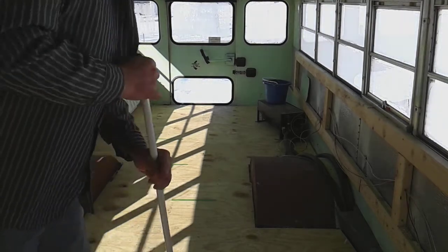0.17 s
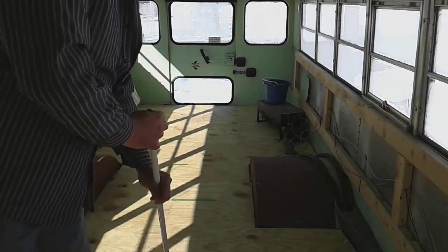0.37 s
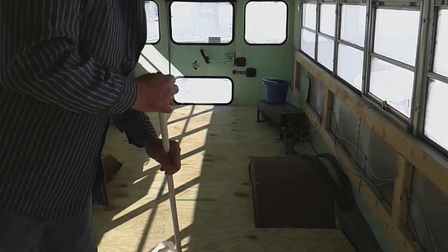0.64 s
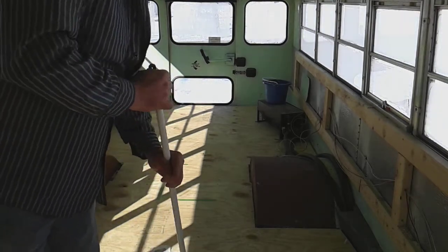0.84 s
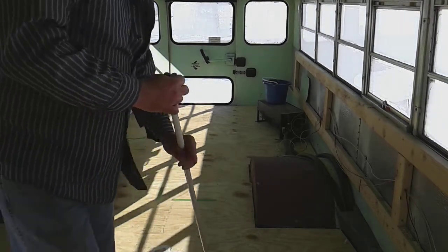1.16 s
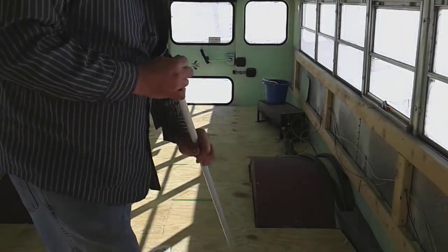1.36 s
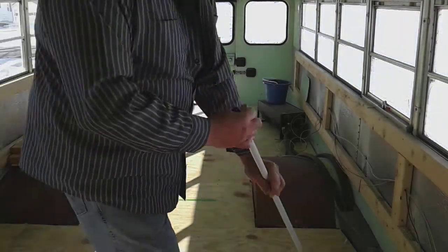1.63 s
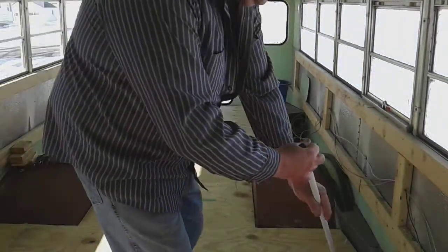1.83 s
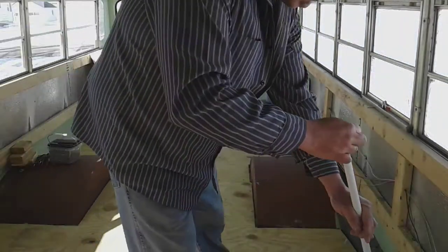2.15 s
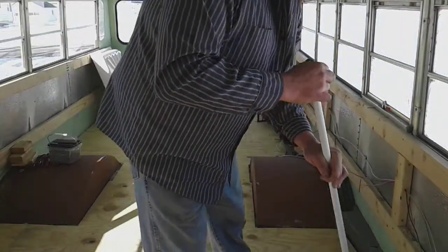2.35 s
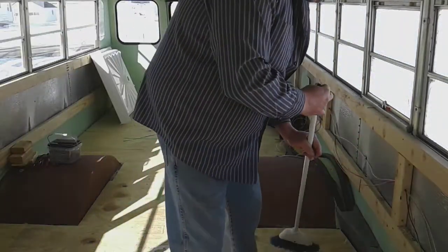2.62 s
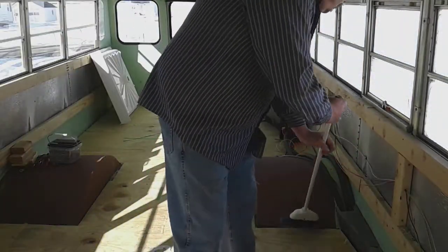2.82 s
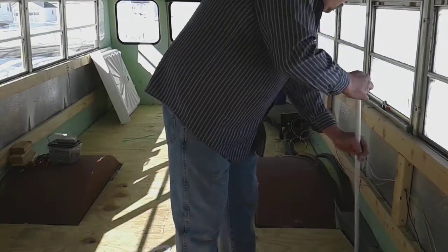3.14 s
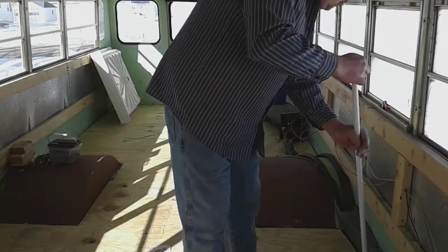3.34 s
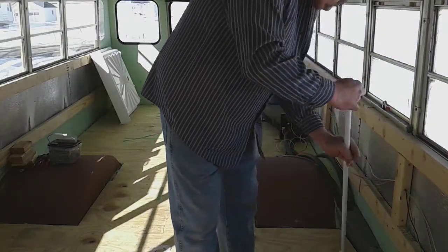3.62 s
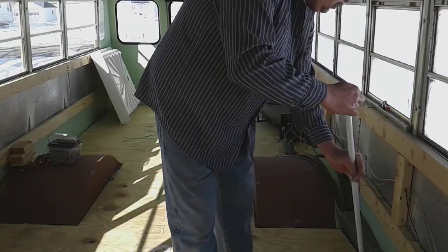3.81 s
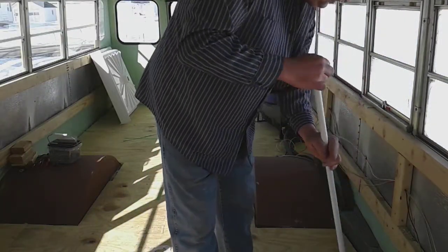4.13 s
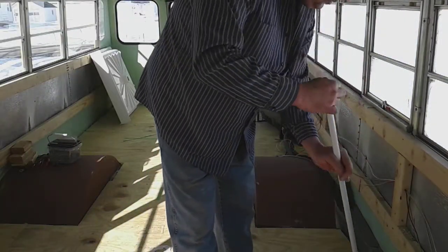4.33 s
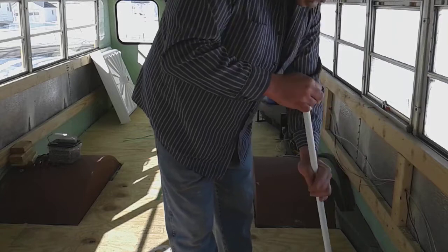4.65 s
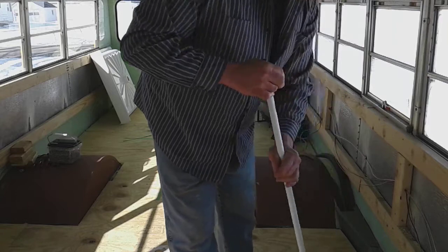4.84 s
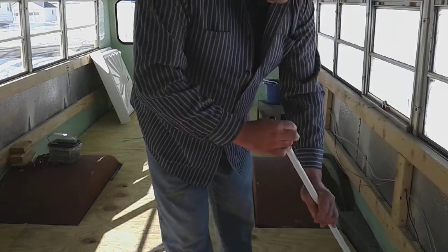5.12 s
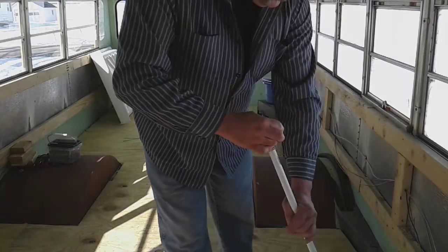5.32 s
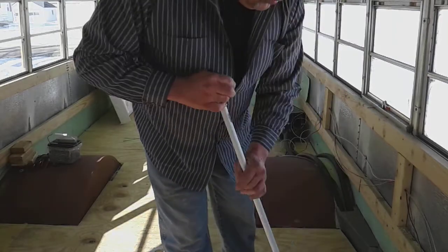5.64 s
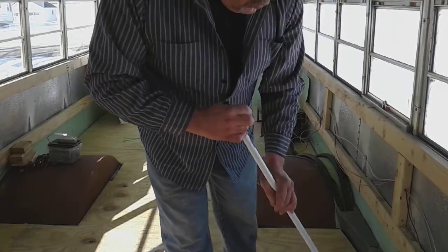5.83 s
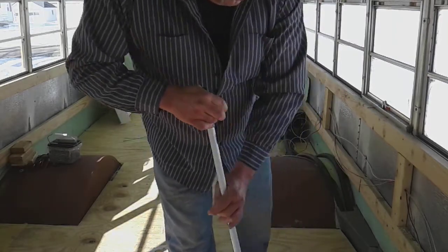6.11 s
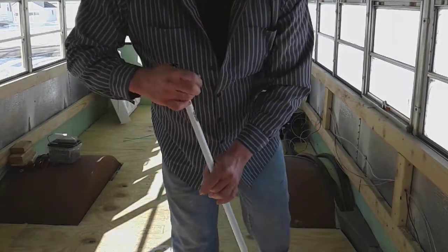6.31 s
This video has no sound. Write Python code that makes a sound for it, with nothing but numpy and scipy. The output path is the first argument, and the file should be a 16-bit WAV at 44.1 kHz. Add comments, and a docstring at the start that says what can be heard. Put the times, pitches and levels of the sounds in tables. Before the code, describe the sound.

A broom works over bare plywood inside an empty bus, heard close on a small microphone with a peaky treble, in a short, boxy reverberation above faint low air. A stroke is already fading at 0 s; feet thud softly around 0.2 s as bristles scuff. Hissing strokes run from 0.3 and 0.9 s, with a bright grit tick at 0.64 s. A sole slaps the loose boards at 1.6 s, another stroke passes at 1.9 s, and a dull footfall lands at 2.5 s. From 2.9 s a stroke swells into the loudest moment, a crunchy shove and hard knock at 3.2-3.4 s. Strokes resume at 3.7 s, with a wall shove and clacks around 3.95-4.2 s, then another stroke and ringing shove at 4.7 s. A hollow bump and sharp ticks come at 5.2-5.3 s over a lighter, longer sweep. A last stroke at 6 s ends in a scraping shove and tap at 6.2 s.

```python
"""Inside an empty bus, a broom sweeps a bare plywood floor close to a small camera's microphone.
Each stroke speeds up, runs and fades: random bristle clicks hiss and scrape, and the boards drum under them.
Four strokes end in a shove against the wall; the broom head taps, and the sweeper's feet bump the deck.
The panels colour the sound and the cabin rings briefly, over steady still air.
The microphone port resonates in the treble, and a noise gate dims the pauses."""
import sys
import numpy as np
from scipy import signal
from scipy.fft import rfft, irfft
from scipy.io import wavfile
from scipy.ndimage import uniform_filter1d

SR = 44100
rng = np.random.default_rng(int(sys.argv[2]) if len(sys.argv) > 2 else 0)


def bounce(signal):
    """Save signal as a 16-bit WAV file at the path given by the first command-line argument."""
    frames = np.transpose(np.atleast_2d(signal))
    limited = np.clip(frames, -1, 1)
    pcm = np.round(limited * 32767).astype(np.int16)
    wavfile.write(sys.argv[1], SR, pcm)


N = 285327
TIME = np.arange(N) / SR


def gain_of(db):
    """Decibels to amplitude."""
    return 10 ** (np.asarray(db) / 20)


def evened(x):
    """Scales to rms 1."""
    return x / np.sqrt(np.mean(x ** 2) + 1e-20)


def read(points, hz):
    """Reads a table on a logarithmic frequency axis."""
    f, value = np.transpose(points)
    return np.interp(np.log(hz + 1), np.log(f + 1), value)


def add(mix, s, sound):
    """Mixes a sound in at time s (seconds)."""
    part = mix[max(round(s * SR), 0):][:len(sound)]
    part += sound[:len(part)]


def colour(x, db_at, size=8192):
    """Causal minimum-phase filter whose gain in dB is the function db_at(Hz)."""
    hz = abs(np.fft.fftfreq(size, 1 / SR))
    log_gain = np.log(gain_of(db_at(hz)))
    response = np.exp(np.conj(signal.hilbert(log_gain)))
    impulse = np.fft.ifft(response).real[:size // 2]
    return signal.oaconvolve(x, impulse)[:len(x)]


def shaped(x, points):
    """Filters by a (Hz, dB) table."""
    return colour(x, lambda hz: read(points, hz))


def high_pass(order, hz):
    """Butterworth high-pass sections."""
    return signal.butter(order, hz, "high", fs=SR, output="sos")


def hump(hz, centre_hz, steepness):
    """A broad band round a centre, in dB."""
    ratio = (hz + 1) / centre_hz
    return -10 * np.log10((ratio ** steepness + ratio ** -steepness) / 2)


def dying(t, t60):
    """Exponential decay, falling 60 dB in t60 seconds."""
    return np.exp(-np.log(1000) * t / t60)


# Still air in the bus and microphone noise. Each row: frequency in Hz, level in dB.
AIR = [(25, -53.5), (55, -41.5), (110, -40.5), (250, -45.5), (600, -51.5), (1800, -57.5), (3200, -65),
       (5000, -80.5), (7000, -78.5), (10000, -73.5), (15000, -68.5)]


def still_air():
    """Steady noise under everything, from white noise coloured by the air table."""
    return shaped(rng.standard_normal(N), AIR)


# Reverberation of the cabin. Each row: frequency in Hz, t60 in seconds.
CABIN_DECAY = [(100, 1), (500, 0.36), (2000, 0.45), (5000, 0.43), (12000, 0.34)]


def cabin(x, wet_db=-8, first_s=0.0029, half_turns_per_s=5, size=256, count=6):
    """Dense reflections, each band dying at its own speed, along paths that keep changing."""
    out = x.copy()
    for k in range(count):
        noise = rng.standard_normal(SR) * (TIME[:SR] > first_s)
        hz, frame_s, bands = signal.stft(noise, SR, nperseg=size)
        fading = bands * dying(frame_s, read(CABIN_DECAY, hz)[:, None])
        tail = signal.istft(fading, SR, nperseg=size)[1]
        # the tails take turns, each at its own phase
        share = np.sqrt(2 / count) * np.cos(np.pi * (half_turns_per_s * TIME + k / count))
        out += gain_of(wet_db) * signal.fftconvolve(x * share, tail / np.linalg.norm(tail))[:N]
    return out


# Narrow resonances of floor and wall panels. Each row: frequency in Hz, width in Hz, lift in dB.
PANELS = [(363.6, 4.8, 8.5), (483, 31, 1.5), (559, 8.4, -2), (660, 15, 6.5), (720, 16, 6.5), (796, 20, 6.5),
          (918, 12, 5.5), (988, 56, 3.5), (1270, 34, 0.5), (1470, 16, -1), (1648, 6, 5.5), (1885, 63, -1.5),
          (1760, 18, 4.5), (2015, 23, 3), (2090, 42, -2.5), (2270, 75, 1), (2410, 64, 1)]


def panels(x, between_db=-2.5):
    """Floor and wall panels favour their own narrow bands in whatever shakes them."""
    def lift_db(f):
        return between_db + sum(db / (1 + (2 * (f - hz) / width) ** 2) for hz, width, db in PANELS)
    return colour(x, lift_db)


# Feet and broom head bumping the floor. Each row: start in seconds, thud level in dB,
# thud centre in Hz, sole slap level in dB, slap tilt in dB per octave (well above 200 Hz),
# slap t60 in seconds.
BUMPS = [(0.1979, -35.5, 101, -37.5, -.5, 0.13), (0.24, -36, 103, -45, -16, 0.11),
         (0.9, -42, 81, -50.5, -8, 0.39), (1.583, -44.5, 144, -30.5, -2, 0.12),
         (1.612, -39, 76.6, -34.5, -5.5, 0.26), (1.85, -46.5, 92, -66, -11, .13),
         (2.466, -38.5, 140, -42.5, -5, 0.39), (2.638, -51.5, 152, -62, -9.5, 0.13),
         (2.726, -57, 130, -55, -9, 0.072), (5.174, -56, 330, -43.5, -2, 0.8),
         (5.199, -36.5, 302, -45.5, -1.5, 0.66), (5.262, -49, 340, -50, -14, 0.35),
         (5.33, -45, 338, -60, -4, 0.25)]
# Modes of the plywood deck. Each row: frequency in Hz, relative level in dB, t60 in seconds.
DECK_MODES = [(74, -1.5, 0.46), (100, -0.5, 0.24), (129.9, 5.5, 0.28), (188, 0, 0.33), (377, 7.5, 0.15),
              (445, 4, 0.19), (540, -18, .28), (676, 13, 0.31)]


def thuds(load_s=0.0041):
    """Each bump loads the deck within milliseconds; where it lands decides which modes answer."""
    out, t = np.zeros(N), TIME[:SR]
    for s, thud_db, centre_hz, *_ in BUMPS:
        ring = np.zeros(len(t))
        for hz, db, t60 in DECK_MODES:
            mode_gain = gain_of(db + hump(hz, centre_hz, 8.2))
            ring += mode_gain * np.sin(2 * np.pi * hz * t) * dying(t, t60)
        loading = 1 - np.exp(-t / load_s)
        add(out, s, gain_of(thud_db) * ring * loading)
    return out


# Spectrum of a sole meeting the loose sheet. Each row: frequency in Hz, relative level in dB.
SLAP_COLOUR = [(60, -31), (170, 10), (250, -5.5), (380, 14), (650, 8.5), (900, 1), (1550, 1), (1900, -17),
               (3000, -29), (5000, -44), (12000, -55)]


def soles():
    """A soft sole slaps and rattles the loose sheet: a dull, decaying noise burst."""
    out, t = np.zeros(N), TIME[:SR // 2]
    for s, _, _, slap_db, tilt_db, t60 in BUMPS:
        dull = lambda hz: read(SLAP_COLOUR, hz) + tilt_db * np.log2(1 + hz / 200)
        burst = evened(colour(rng.standard_normal(len(t)), dull))
        add(out, s, gain_of(slap_db) * burst * dying(t, t60))
    return out


# Broom head and grit tapping. Each row: start in seconds, level in dB, centre in Hz, t60 in seconds.
TAPS = [(0.167, -51.5, 2980, 0.031), (.642, -30, 11100, 0.036), (0.8396, -57, 5600, 0.012),
        (0.898, -36.5, 1480, 0.038), (2.637, -61, 7000, 0.042), (2.685, -65, 6040, 0.14),
        (3.328, -24, 4900, 0.012), (3.329, -27.5, 560, 0.11), (3.513, -43, 2000, 0.073),
        (3.945, -29.5, 2520, 0.041), (3.956, -40, 935, 0.5), (4.159, -35.5, 690, 0.13),
        (4.1918, -32.5, 3200, 0.01), (4.262, -59, 1160, 0.037), (4.955, -46.5, 1160, 0.088),
        (5.064, -51, 1800, 0.017), (5.268, -30.5, 3200, 0.006), (5.268, -28, 12500, 0.0089),
        (5.278, -32, 13000, .012), (6.208, -29, 2640, 0.061), (6.237, -39, 1400, 0.071)]


def taps(steepness=4, crack=0.1, crack_t60=0.0016):
    """A crack and a short rattle: low where the head meets wood, high where a grain of grit jumps."""
    out, t = np.zeros(N), TIME[:SR // 2]
    for s, db, centre_hz, t60 in TAPS:
        noise = rng.choice([-1., 1.], len(t))
        burst = evened(colour(noise, lambda hz: hump(hz, centre_hz, steepness)))
        add(out, s, gain_of(db) * burst * (dying(t, t60) + crack * dying(t, crack_t60)))
    return out


def flicks(per_s, spread_db, clump_db, clump_hz):
    """Bristles catch and let go: random clicks of uneven size, bunched as whole tufts slip."""
    clicks = (rng.random(N) < per_s / SR) * rng.choice([-1, 1], N)
    size_db = spread_db * np.minimum(rng.exponential(1, N), 4)
    smoothing = 1 + (np.fft.rfftfreq(N, 1 / SR) / clump_hz) ** 2
    tufts = evened(irfft(rfft(rng.standard_normal(N)) / smoothing, N))
    return evened(clicks * gain_of(size_db + clump_db * np.clip(tufts, -2, 2)))


def blow(s, rise_s, hold_s, t60):
    """Attack, hold and release of one push on the bristles."""
    t = np.maximum(TIME - s, 0)
    return (1 - np.exp(-(t / rise_s) ** 2)) * dying(np.maximum(t - hold_s, 0), t60)


# The broom is shoved into the foot of the wall. Each row: start in seconds, scrape, hiss and
# drumming levels in dB, board centre in Hz, wall ring level in dB, rise in seconds,
# hold in seconds, t60 in seconds.
SHOVES = [(3.232, -23, -32, -29.5, 670, -51, 0.085, .13, 0.31),
          (3.949, -36.5, -35.5, -34.5, 980, -47, 0.0097, 0.06, 0.51),
          (4.687, -33.5, -43, -39, 546, -30, 0.013, 0.068, 0.51),
          (6.198, -29, -37.5, -36.5, 758, -27, 0.0066, 0.04, 0.31)]
# What the wall and its battens answer with. Each row: frequency in Hz, width in Hz, relative level in dB.
WALL_BANDS = [(530, 57, 3), (680, 270, -6.5), (922, 100, 0.5), (1483, 93, 6.5), (1870, 200, -2),
              (2520, 300, -0.5), (6150, 2600, -31.5)]


def shoves():
    """The whole head buckles against the wall: a swell of bristle snaps rings the panelling."""
    force = np.zeros(N)
    for s, *_, wall_db, rise_s, hold_s, t60 in SHOVES:
        force += gain_of(wall_db) * blow(s, rise_s, hold_s, t60)

    def ring_db(f):
        power = sum(gain_of(db) ** 2 / (1 + ((f - hz) / width) ** 2) ** 2 for hz, width, db in WALL_BANDS)
        return 10 * np.log10(power + 1e-8)
    snaps = flicks(per_s=1200, spread_db=0.5, clump_db=2.5, clump_hz=80)
    return colour(force * snaps, ring_db) / np.std(colour(snaps, ring_db))


# Bristles land, catch or spring back. Each row: start in seconds, scrape level in dB,
# hiss level in dB, rise in seconds, t60 in seconds.
SCUFFS = [(0.166, -62, -56, 0.004, 0.84), (0.213, -34.5, -33.5, 0.029, 0.39),
          (0.334, -31.5, -57, 0.024, 0.22), (0.62, -58, -34.5, .015, 0.2),
          (0.835, -57, -52.5, 0.0036, 0.97), (0.89, -39.5, -41, 0.0048, 0.36), (1.75, -75, -55, 0.0081, .2),
          (1.923, -52, -60, 0.016, 0.42), (3.512, -33.5, -69, 0.0028, .42), (3.705, -43, -54, 0.021, .5),
          (3.839, -42.5, -32, 0.014, 0.26), (4.186, -37.5, -56, 0.0042, 0.39),
          (4.257, -40, -73, 0.0041, 0.15), (4.303, -49, -62.5, 0.0041, 0.1), (4.438, -42, -54, 0.014, 0.31),
          (4.948, -43, -74, 0.0056, 0.21), (5.058, -58, -84, 0.0056, 0.56), (5.197, -41, -43, 0.016, 0.57),
          (5.325, -41, -38.5, 0.031, 0.56), (5.964, -47.5, -57, 0.0062, 0.55)]
SCUFF_DRUM_DB = -6.5  # drumming against the scrape of the same scuff
# the head meets the boards just before the bristles buckle and lets go first; the hiss has its own t60 (s)
HEAD_LEAD_S, HEAD_HOLD_SHARE, SHOVE_HISS_T60 = 0.013, 0.9, .38


def jolts():
    """Scrape, hiss and drumming gains over time as scuffs and shoves push the bristles."""
    scrape, hiss, drum = np.zeros((3, N))
    for s, scrape_db, hiss_db, rise_s, t60 in SCUFFS:
        push = blow(0, rise_s, 0, t60)[:SR]
        add(scrape, s, gain_of(scrape_db) * push)
        add(hiss, s, gain_of(hiss_db) * push)
        add(drum, s, gain_of(scrape_db + SCUFF_DRUM_DB) * push)
    for s, scrape_db, hiss_db, drum_db, _, _, rise_s, hold_s, t60 in SHOVES:
        scrape += gain_of(scrape_db) * blow(s, rise_s, hold_s, t60)
        hiss += gain_of(hiss_db) * blow(s, rise_s, rise_s, SHOVE_HISS_T60)
        drum += gain_of(drum_db) * blow(s - HEAD_LEAD_S, rise_s, HEAD_HOLD_SHARE * hold_s, t60)
    return scrape, hiss, drum


# Sweeps over the floor. Each row: start in seconds, then speeding up, full speed and slowing in
# seconds, touch-down level in dB, hiss level in dB, top treble in dB against the hiss,
# scrape level in dB, leaning on in dB per second, drumming level in dB, board centre in Hz.
STROKES = [(-0.1, 0.056, 0.061, 0.2, -10, -42.5, 4.5, -50.5, 0, -54, 490),
           (0.31, 0.093, .27, 0.19, -11, -37, 4, -46.5, -24, -51, 427),
           (0.895, 0.11, .11, 0.19, -11, -39.5, 3, -47, -63, -52, 617),
           (1.6, 0.22, 0.078, 0.045, -4.5, -66, -8, -63.5, -14, -61, 490),
           (1.925, .17, 0.21, 0.18, -19.5, -40.5, 2, -49, 7, -51.5, 485),
           (2.885, .41, 0.049, 0.31, -24.5, -32.5, 3.5, -39.5, -15, -41, 454),
           (3.703, 0.22, .17, 0.3, -7, -40, 1.5, -46.5, 0, -46.5, 388),
           (4.438, 0.21, 0.096, 0.41, -7.5, -41, 2, -49.5, -8, -49, 444),
           (5.172, 0.041, 0.43, 0.32, -3.5, -49, 5.5, -57, 14, -60, 466),
           (5.965, 0.22, 0.045, 0.16, -9, -44.5, 0.5, -53.5, 2, -52, 637)]
# a stroke gathers speed along a curve, then dies away; the scrape outlasts the hiss
RISE_CURVE, FALL_CURVE, HISS_FADE_DB, SCRAPE_FADE_DB = 1.115, 1.03, -42.5, -24.5
# the gentler the touch-down, the longer the bristles take to settle
SETTLE_S_PER_DB, LIFT_S = .0013, .02
# the treble needs speed: hiss and top gather from further down than the scrape (times its dB)
HISS_GATHER, TOP_GATHER = 1.07, 1.37
# a light touch is brighter: the top fades less than the hiss, and gains as weight comes off (dB per dB)
TOP_FADE_DB, LIGHT_TOUCH = -30.5, .5


def sweeping():
    """Scrape, hiss, top treble and drumming gains: each stroke speeds up, runs, slows and lifts."""
    gains = np.zeros((4, N))
    for start, rise_s, hold_s, fall_s, touch_db, hiss_db, top_db, scrape_db, lean_db, drum_db, _ in STROKES:
        t = TIME[:round((rise_s + hold_s + fall_s + LIFT_S) * SR)]
        settling = t / abs(SETTLE_S_PER_DB * touch_db)
        lifting = (t[-1] - t) / LIFT_S
        contact = np.clip(np.minimum(settling, lifting), 0, 1)
        gather_db = touch_db * np.maximum(1 - t / rise_s, 0) ** RISE_CURVE
        slowing = np.maximum((t - rise_s - hold_s) / fall_s, 0) ** FALL_CURVE
        # weight shifts evenly about the middle of the full-speed run
        leaning_db = lean_db * (np.clip(t - rise_s, 0, hold_s) - hold_s / 2)
        weight_db = gather_db + SCRAPE_FADE_DB * slowing + leaning_db
        speed_db = HISS_GATHER * gather_db + HISS_FADE_DB * slowing
        bright_db = TOP_GATHER * gather_db + TOP_FADE_DB * slowing - LIGHT_TOUCH * leaning_db
        levels = [scrape_db + weight_db, hiss_db + speed_db, hiss_db + top_db + bright_db, drum_db + weight_db]
        already_run = max(round(-start * SR), 0)  # samples of a stroke begun before time zero
        for gain, db in zip(gains, levels):
            add(gain, start, (contact * gain_of(db))[already_run:])
    return gains


def boards(push, centre_hz, steepness=3):
    """The floor drums most in the bands near the pitch of the spot under the broom."""
    bands_hz = np.geomspace(200, 1270, num=9)
    spectrum, log_hz = rfft(push), np.log(np.fft.rfftfreq(N, 1 / SR) + 1)
    out = np.zeros(N)
    for hz, only_this in zip(bands_hz, np.eye(len(bands_hz))):
        share = np.interp(log_hz, np.log(bands_hz), only_this)  # overlapping triangular bands
        out += irfft(spectrum * share, N) * gain_of(hump(hz, centre_hz, steepness))
    return out


def resonate(x, hz, width_hz):
    """A moving resonance: shifts the curve hz down to zero, smooths twice, and shifts back."""
    turn = np.exp(2j * np.pi * np.cumsum(hz) / SR)
    r = np.exp(-np.pi * width_hz / SR)
    return (turn * signal.lfilter([(1 - r) ** 2], [1, -2 * r, r ** 2], x / turn)).real


def sheen(hiss, straight_hz=10000, bent_hz=6500, width_hz=1500, sheen_db=-15, onset_s=0.21):
    """Flicked bristles ring; the ring sinks as they bend over in the course of a stroke."""
    hz, started = np.full(N, float(bent_hz)), np.zeros(N)
    for start, rise_s, hold_s, fall_s, *_ in STROKES:
        end = start + rise_s + hold_s + fall_s
        during = (TIME >= start) & (TIME <= end)
        hz[during] = np.interp(TIME[during], [start, end], [straight_hz, bent_hz])
        started[during] = 1 - np.exp(-(TIME[during] - start) / onset_s)
    ring = resonate(flicks(per_s=3000, spread_db=4.5, clump_db=-0.5, clump_hz=100), hz, width_hz)
    return gain_of(sheen_db) * hiss * started * evened(ring)


# Colours of the rubbing: fine tips, stiff bristles, hard-pressed snaps, pushes on the boards.
# Each row: frequency in Hz, gain in dB.
HISS_COLOUR = [(500, -35), (2500, -3), (4000, -5.5), (5000, -9), (6200, -4.5), (7200, -4.5), (8500, -2.5),
               (10500, -7.5), (15000, -8)]
SCRAPE_COLOUR = [(250, -31), (420, -34), (700, -10), (1100, 8.5), (1550, 14), (2000, 12), (2550, 10),
                 (3200, 3.5), (4200, -6.5), (5500, -26), (9000, -48), (15000, -27)]
CRUNCH_COLOUR = [(1000, -7), (2500, -23), (3500, -2), (5000, -8.5), (6600, -8.5), (8000, -35.5),
                 (15000, -28)]
DRUM_COLOUR = [(35, -16), (70, 5.5), (130, 24), (190, 18), (260, 11), (350, 17.5), (500, 18.5), (720, 17),
               (950, 16), (1300, 18), (2500, 2), (6000, -24)]


def broom(hard_db=-27, crunch_growth=0.58, top_hz=10000, jolt_top_db=-3):
    """Fine tips hiss, stiff bristles scrape and drum the boards; pressed hard they crunch."""
    scrape, hiss, bright, drum = sweeping()
    jolt_scrape, jolt_hiss, jolt_drum = jolts()
    # strokes and jolts add as powers
    scrape, hiss, drum = np.hypot(scrape, jolt_scrape), np.hypot(hiss, jolt_hiss), np.hypot(drum, jolt_drum)
    bright = np.hypot(bright, gain_of(jolt_top_db) * jolt_hiss)

    # board pitch glides from stroke to stroke, and leans to the shove's spot as jolts take over
    spot_hz = np.interp(TIME, [row[0] + row[1] for row in STROKES], [row[-1] for row in STROKES])
    jolt_hz = np.interp(TIME, [row[0] for row in SHOVES], [row[4] for row in SHOVES])
    jolt_share = (jolt_drum / (drum + 1e-9)) ** 2
    centre_hz = spot_hz + (jolt_hz - spot_hz) * jolt_share

    tips = shaped(flicks(per_s=12000, spread_db=1.5, clump_db=0.8, clump_hz=150), HISS_COLOUR)
    top = signal.sosfiltfilt(high_pass(4, top_hz), tips)
    stiff = shaped(scrape * flicks(per_s=3500, spread_db=1.0, clump_db=0.66, clump_hz=70), SCRAPE_COLOUR)
    pushes = shaped(drum * flicks(per_s=2100, spread_db=-1.0, clump_db=-0.1, clump_hz=50), DRUM_COLOUR)
    # the crunch grows faster than the scrape
    crunch = scrape * (scrape / gain_of(hard_db)) ** crunch_growth
    snaps = shaped(crunch * flicks(per_s=2600, spread_db=1.5, clump_db=6, clump_hz=91), CRUNCH_COLOUR)
    return hiss * (tips - top) + bright * top + stiff + snaps + boards(pushes, centre_hz) + sheen(hiss)


def scene():
    """Everything reaches one microphone, heard alike in both ears; thuds and air skip the cabin."""
    in_cabin = cabin(panels(broom() + shoves() + soles() + taps()))
    sound = in_cabin + thuds() + still_air()
    return np.array([sound, sound])


def gate(x, threshold_db=-55, depth_db=6, knee_db=1.0, size=700):
    """Turns the sound down while its own level, averaged over size samples, is under the threshold."""
    power = abs(uniform_filter1d((x ** 2).mean(0), size))
    level_db = 10 * np.log10(power + 1e-12)
    shut = .5 - .5 * np.tanh((level_db - threshold_db) / knee_db)
    return x * gain_of(-depth_db * uniform_filter1d(shut, size))


PORT_HZ, PORT_Q = 7005, 7.6
LOW_CUT_HZ, EDGE_HZ = 56, 15850


def record(dry):
    """The air in the microphone port resonates; then bass cut, noise gate and band limit."""
    port_db = lambda hz: -20 * np.log10(abs(1 - (hz / PORT_HZ) ** 2 + 1j * hz / (PORT_HZ * PORT_Q)))
    heard = np.array([colour(channel, port_db) for channel in dry])
    bass_cut = signal.sosfilt(high_pass(4, LOW_CUT_HZ), heard)
    gated = gate(bass_cut)
    edge = signal.firwin(1023, EDGE_HZ, window=("kaiser", 9), fs=SR)
    return signal.oaconvolve(gated, edge[None], "same")


dry = scene()
out = record(dry)
bounce(out)
```